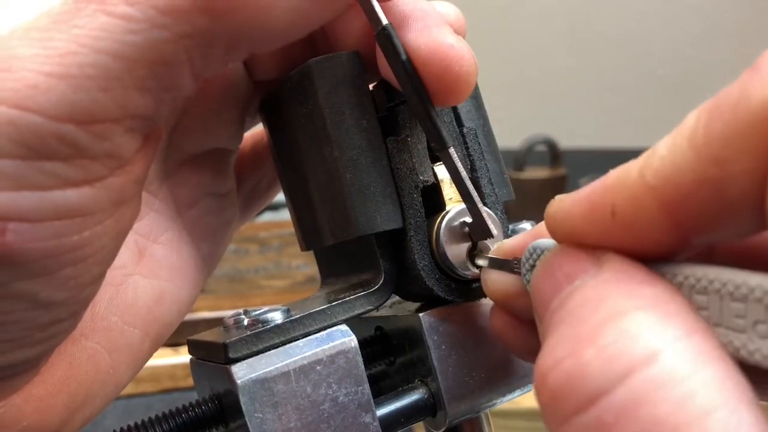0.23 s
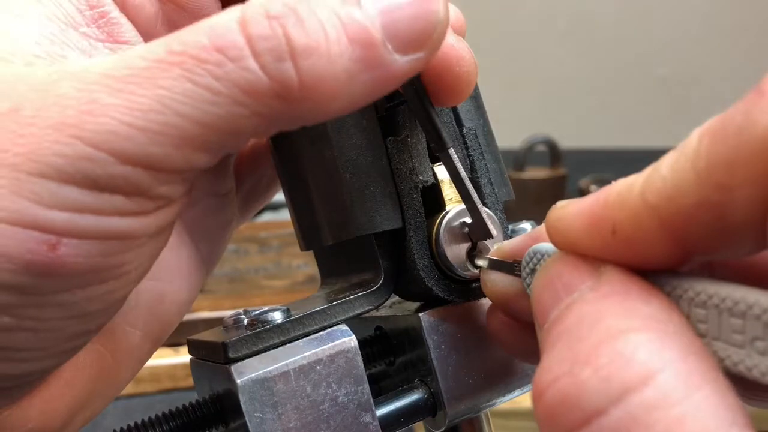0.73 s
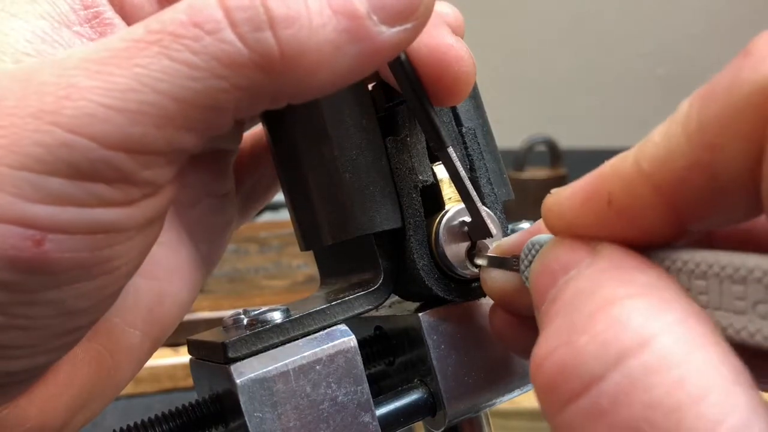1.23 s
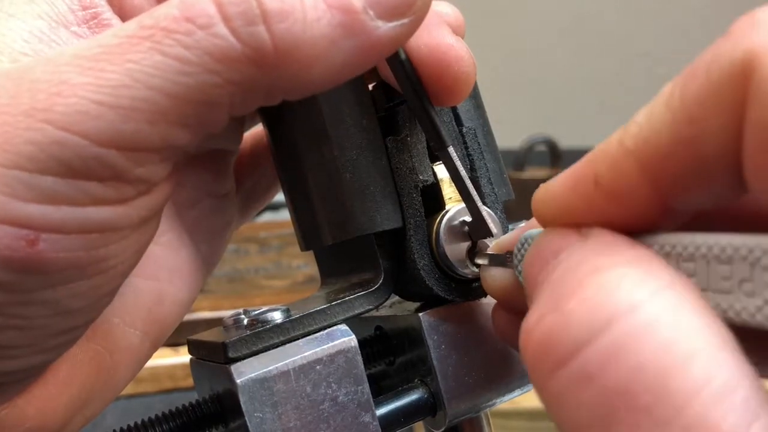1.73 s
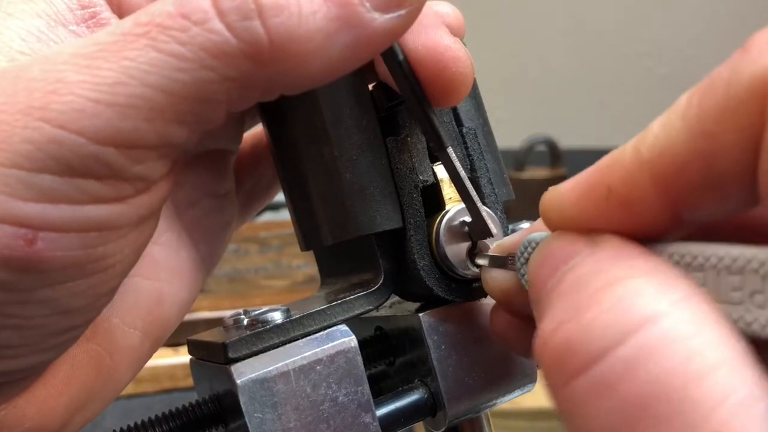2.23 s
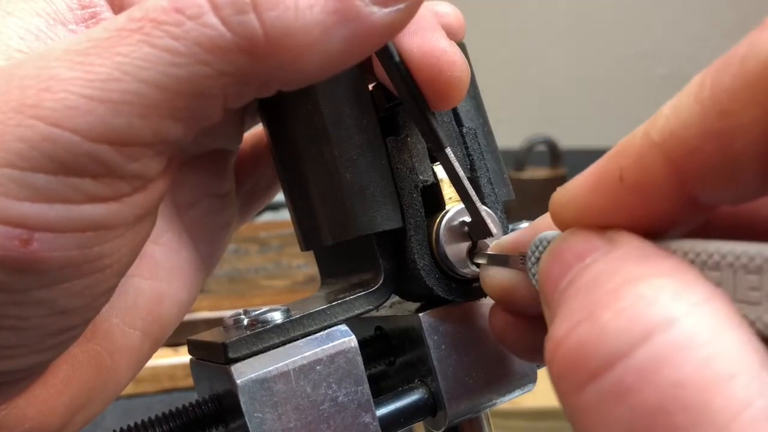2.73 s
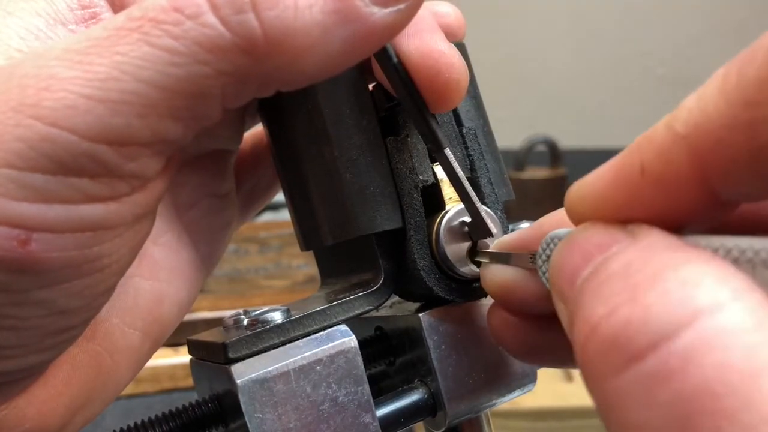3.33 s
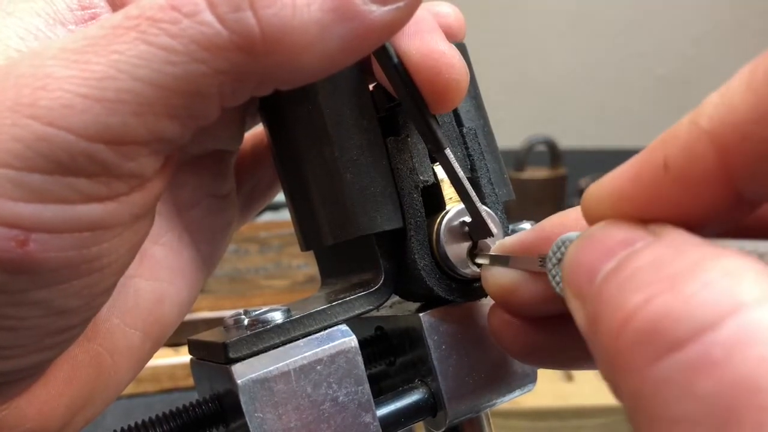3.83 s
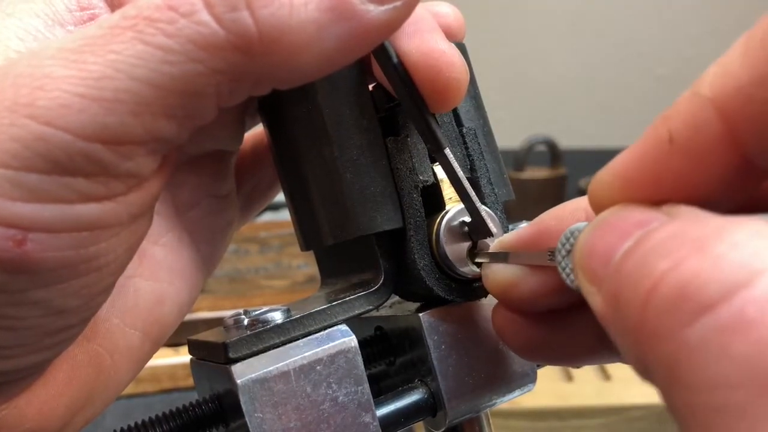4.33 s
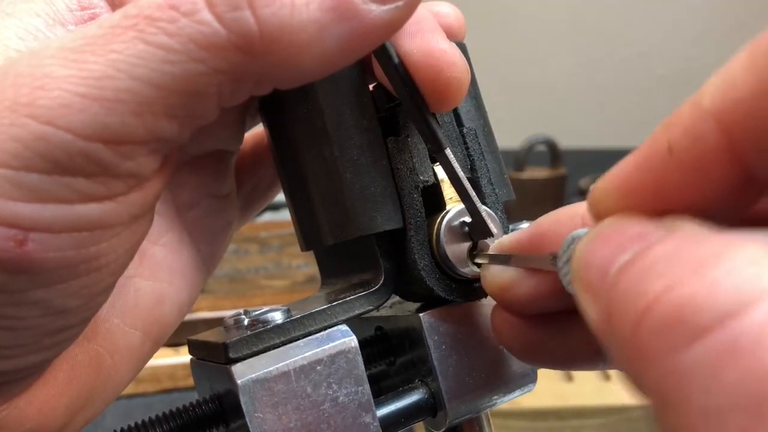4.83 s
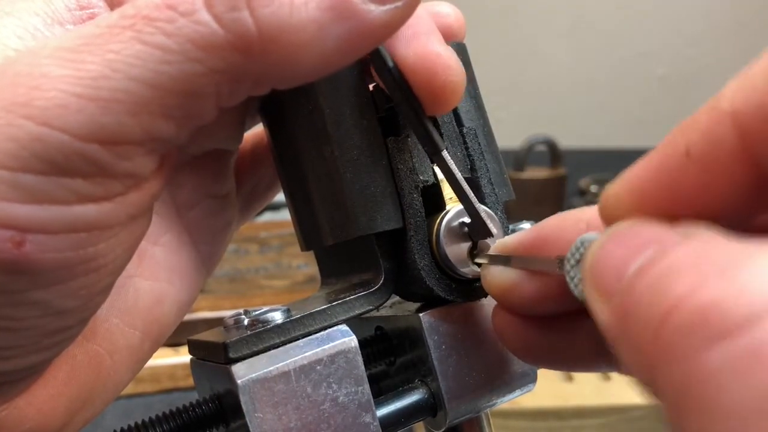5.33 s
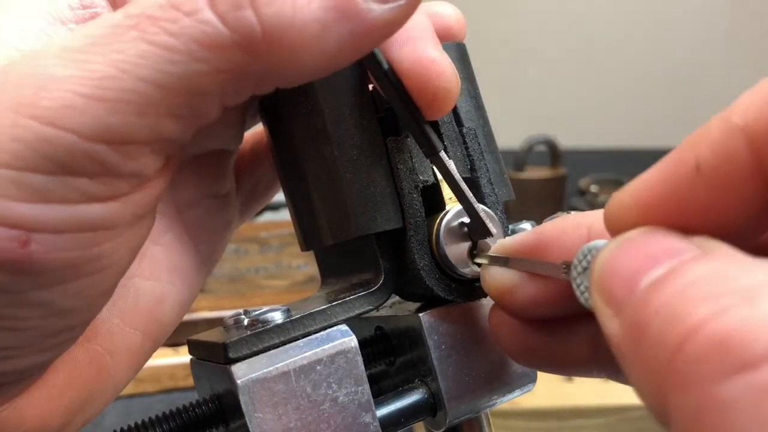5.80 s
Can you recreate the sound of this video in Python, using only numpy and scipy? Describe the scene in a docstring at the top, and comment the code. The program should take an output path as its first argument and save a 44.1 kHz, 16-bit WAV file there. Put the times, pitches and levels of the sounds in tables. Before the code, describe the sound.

A lock held in a vise is picked close to the microphone, over the faint hiss and low rumble of a quiet room. In the first second there are only a few soft, dull bumps from fingers and the lock body. From about 1.5 seconds, small metallic ticks come as pins break free and land. Just before 2 seconds the cylinder gives way with a loud, bright snap, by far the loudest sound, with a very quick bounce, a short metallic ring and a low thud from the vise that dies within half a second. Quiet picking resumes with a cluster of clicks, tiny scrapes and bumps around 2.6 to 2.8 seconds, the tension wrench ringing briefly. More ticks come near 3.3 and 3.6 seconds, then sparse light taps and soft knocks, a firmer click around 5.1 seconds, and last small ticks near 5.4 and 6 seconds.

```python
"""A pin tumbler lock, held in a vise, is picked close to the microphone in a quiet room.
First, fingers bump the lock and the pick leans on pins that stick. Then pins tick as they break free
and again as they land; the harder tick knocks the lock body and rings the tension wrench.
Near two seconds the plug (the part that turns) gives way with a loud snap that bounces, rings the
lock's shell and shakes the vise. After that the pick goes on scraping, tapping and freeing pins."""
import sys
import numpy as np
from scipy import signal
from scipy.fft import rfft, irfft, next_fast_len
from scipy.io import wavfile
from scipy.ndimage import uniform_filter1d, map_coordinates

SR = 44100
rng = np.random.default_rng(int(sys.argv[2]) if len(sys.argv) > 2 else 0)


def digitize_waveform(pressure):
    """Quantize a signal to 16-bit integers and store it at the path in sys.argv[1].

    Rows of a 2-D input are taken as channels; values are limited to [-1, 1].
    """
    field = np.atleast_2d(pressure).T
    bounded = np.clip(field, -1, 1)
    quanta = np.round(bounded * 32767).astype(np.int16)
    wavfile.write(sys.argv[1], SR, quanta)


N = 267422
LEAD_IN = .002  # seconds of quiet at the front of each short sound
TIP_HZ = 6650  # the pick's tip always rings at this pitch

# The tone colour of the pick on a pin. Each row: frequency in Hz, relative level in dB.
PICK_COLOUR = [(100, -39.5), (900, -21.5), (2200, -12), (3000, -2.5), (4200, -1), (5200, -0.5),
               (6100, -3.5), (7800, -4), (9200, -3), (11300, 2), (15500, -3.5)]
# Pins that break free and land. A fade time (t60) is how long a sound takes to drop by 60 dB.
# Each row: start in seconds, travel time in seconds, release level, landing level, brightness,
# tick fade time in seconds, blade pitch in Hz, blade boost, body level, body pitch ratio,
# wrench clack level, wrench ring level. Levels, brightness and boost are in relative dB.
PINS = [(1.5747, 0.0082, -66.5, -73, -6, .0045, 11460, 3, -69, 0.86, -82, -91),
        (1.6125, 0.0065, -51, -49.5, 3.5, 0.007, 15200, 6.5, -52, 0.95, -53, -68),
        (1.745, .0077, -57.5, -61, 8, .006, 6600, 5, -50.5, 0.95, -71, -80),
        (1.7607, .007, -70, -55.5, -4, 0.0084, 11300, 4, -61, 0.81, -74, -76),
        (1.922, .012, -63.5, -68, 10.5, .0045, 13800, 4, -73.5, 1.1, -83, -85),
        (2.626, 0.0045, -60, -55, 0.5, 0.0044, 6706, -1, -51.5, 0.98, -57, -79),
        (2.676, 0.01, -54, -57.5, 2, .005, 6670, 1, -55.5, 0.975, -65, -83.5),
        (2.771, 0.0077, -47.5, -54.5, 2.5, 0.0085, 5400, 6, -52, 1.1, -50, -46),
        (3.2482, 0.011, -49.5, -57, -3, 0.0089, 13500, 2, -53, 0.94, -57, -61),
        (3.2639, 0.008, -47, -53, 4, .007, 6600, 3, -60, 1.18, -60.5, -65),
        (3.6014, .0083, -55.5, -51.5, -1, 0.0053, 5180, 6, -55, 1.04, -69, -84),
        (4.3028, .007, -59, -80, 6, 0.0044, 10900, 8, -78, 1, -80, -89.5),
        (4.606, .0045, -54.5, -68, 4, 0.0041, 8103, 6, -52.5, 0.98, -54, -74),
        (5.1271, 0.0067, -42.5, -67, -10.5, .002, 5000, 3.5, -48, 1.05, -65, -63),
        (5.4053, .0066, -51.5, -70, 7, 0.0031, 15430, 12.5, -62, 0.97, -66, -75.5),
        (6.0207, 0.008, -54.5, -53.5, .5, .0045, 7870, 5, -63.5, 0.97, -68, -74)]
# The plug turns, strikes the pins and bounces.
# Each row: start in seconds, level in dB, rise time in seconds, fade time in seconds.
PLUG_STRIKES = [(1.9448, -11, .0007, 0.0043), (1.9522, -25.5, .0003, .0022), (1.9653, -26.5, .0002, .0028),
                (1.9782, -50, .0003, .004)]


def amp(db):
    """Turn decibels into a number to multiply by."""
    return 10 ** (np.asarray(db) / 20)


def unit(x):
    """Scale a sound so that its average strength (rms) is 1."""
    return x / np.sqrt(np.mean(x ** 2) + 1e-20)


def along(points, hz):
    """Read between (frequency, value) points, with frequency on a log scale."""
    frequencies, values = np.transpose(points)
    return np.interp(np.log(hz + 1), np.log(frequencies + 1), values)


def filtered(x, response):
    """Turn each frequency of a sound up or down by response(hz)."""
    size = next_fast_len(len(x) + 2 ** 12)
    return irfft(rfft(x, size) * response(np.fft.rfftfreq(size, 1 / SR)), size)[:len(x)]


def band_limit(hz, top_hz=16250):
    """Gains that cut off the very highest treble steeply."""
    return 1 / np.sqrt(1 + (hz / top_hz) ** 140)


def causal(gain):
    """Make a filter with these gains that rings only after it is struck, never before."""
    cepstrum = irfft(np.log(np.maximum(gain, 1e-6)))
    half = len(cepstrum) // 2
    return np.exp(rfft(np.concatenate([cepstrum[:1], 2 * cepstrum[1:half], np.zeros(half)])))


def add(track, s, sound):
    """Mix a sound into the track so that it strikes at s seconds."""
    start = max(round((s - LEAD_IN) * SR), 0)
    part = track[start:start + len(sound)]
    part += sound[:len(part)]


def ring(modes, attack, scatter_db, detune):
    """A struck part rings with fading tones; grip and point of contact change them a little each time."""
    t = np.maximum(np.arange(SR // 4) / SR - LEAD_IN, 0)
    hz, db, t60 = np.transpose(modes)[:, :, None]
    hz = hz * (1 + detune * rng.standard_normal(hz.shape))
    level = db + scatter_db * rng.standard_normal(hz.shape) - 60 * t / t60
    tones = amp(level) * np.cos(2 * np.pi * hz * (t - attack))
    sound = tones.sum(0) * (1 - np.exp(-(t / attack) ** 2))
    return sound / np.abs(sound).max()


def contact(colour, t60, after_db, after_t60, bright_db, rise=.0001, smooth_bins=130):
    """Two things hit: a burst of noise made of a main part and a quieter one, each with its own fade."""
    t = np.maximum(np.arange(SR // 6) / SR - LEAD_IN, 0)
    onset = 1 - np.exp(-(t / rise) ** 2)
    fade = amp(-60 * t / t60) + amp(after_db - 60 * t / after_t60)
    burst = onset * rng.standard_normal(len(t)) * fade
    size = 2 ** 13
    spectrum, hz = rfft(burst, size), np.fft.rfftfreq(size, 1 / SR)
    # the fine detail is chance, but the broad colour belongs to the material
    flatten = 1 / np.sqrt(np.abs(uniform_filter1d(np.abs(spectrum) ** 2, size=smooth_bins)) + 1e-12)
    # the brightness setting turns the high treble up or down
    tilt = [(6300, 0.00042), (8500, 0.49 * bright_db), (15000, bright_db)]
    gain = flatten * amp(along(colour, hz) + along(tilt, hz))
    click = irfft(spectrum * causal(gain) * band_limit(hz), size)[:len(t)]
    return click / np.linalg.norm(click) * np.sqrt(SR / 1000)  # the energy of one millisecond at rms 1


def air(level_db=-68, rumble_hz=350, swing_db=.8, swells_per_s=14):
    """The room rumbles a little unevenly under the steady hiss of the microphone."""
    # The colour of rumble and hiss. Each row: frequency in Hz, relative level in dB.
    air_colour = [(15, -58), (25, -27), (40, -10.5), (56, -6), (114, -2.8), (153, -3.5), (185, -3),
                  (212, -5.5), (242, -2.5), (270, -7.5), (463, -12), (1130, -22), (2160, -26),
                  (10100, -31.5), (16000, -34)]
    noise = unit(filtered(rng.standard_normal(N), lambda hz: amp(along(air_colour, hz))))
    rumble = filtered(noise, lambda hz: 1 / (1 + (hz / rumble_hz) ** 4))
    swell = map_coordinates(rng.standard_normal(2 ** 8), [np.arange(N) / SR * swells_per_s], mode="wrap")
    return amp(level_db) * (noise + rumble * (amp(swing_db * swell) - 1))


def room(x, build_up_s):
    """The bench and walls throw the sound back; the bass hangs on longest."""
    # How long the echo lasts. Each row: frequency in Hz, fade time in seconds.
    fade_times = [(160, 0.94), (260, .4), (500, 0.39), (2000, 0.2), (6000, .15), (14000, 0.14)]
    # How strong the echo is. Each row: frequency in Hz, gain in dB.
    echo_gains = [(160, -8.5), (300, -11.5), (500, -18), (1000, -18.5), (2000, -19), (4500, -23),
                  (7000, -23), (10700, -23), (14000, -29)]
    hz, t, spectra = signal.stft(rng.standard_normal(SR), SR, nperseg=512)
    t60 = along(fade_times, hz)[:, None]
    tail = signal.istft(spectra * amp(-60 * t / t60) / np.sqrt(t60), SR, nperseg=512)[1]
    tail *= 1 - np.exp(-np.arange(len(tail)) / SR / build_up_s)
    echo = signal.fftconvolve(x, tail / np.linalg.norm(tail))[:N]
    return filtered(echo, lambda hz: amp(along(echo_gains, hz)))


def bumps():
    """Fingers shift their grip and bump softly against the lock."""
    # The finger bumps. Each row: start in seconds, level in dB.
    touches = [(.36, -57), (.725, -62), (2.612, -53), (2.64, -52), (2.66, -51), (3.53, -56), (4.77, -55),
               (4.925, -53), (4.945, -50.5), (5.409, -56.5), (5.423, -52.5)]
    # The colour of a soft finger. Each row: frequency in Hz, relative level in dB.
    finger_colour = [(30, -16), (80, 1.5), (200, -1), (400, -8), (800, -27), (3000, -55)]
    out = np.zeros(N)
    for s, db in touches:
        bump = contact(finger_colour, t60=.032, after_db=-13, after_t60=.073, bright_db=0, rise=.0038)
        add(out, s, amp(db) * bump)
    return out


def blade(x, ring_hz, width_hz, boost_db):
    """The thin steel blade of the pick rings with whatever it touches."""
    def response(hz):
        damping = 1j * hz * width_hz
        return 1 + amp(boost_db) * damping / (ring_hz ** 2 - hz ** 2 + damping)
    return filtered(x, response)


def friction(length, slips_per_s=3000, spread_db=4):
    """Sliding steel catches and slips in many tiny steps, over a light hiss."""
    n = max(int(length * SR), 2)
    slipping = rng.random(n) < slips_per_s / SR
    slips = slipping * rng.choice([-1, 1], n) * amp(spread_db * rng.standard_normal(n))
    return unit(unit(slips) + 0.55 * rng.standard_normal(n))


def scrapes():
    """The pick drags over the pins and its tip rings; each drag has its own brightness."""
    # The drags. Each row: start in seconds, length in seconds, relative level in dB, brightness in dB.
    drags = [(1.758, 0.019, -63, -1), (2.625, 0.039, -65, 0), (2.641, .008, -63, 0),
             (2.663, .024, -61.5, -6), (3.25, .028, -60, 1), (3.595, 0.0092, -59, 6), (3.609, .005, -57, 0),
             (4.909, .03, -64, -3), (5.427, .012, -70, -2), (6.013, 0.024, -64, -3)]
    out = np.zeros(N)
    for s, length, db, bright_db in drags:
        drag = friction(length)
        swell = np.hanning(len(drag)) ** 0.19
        drag = np.pad(amp(db) * drag * swell, round(LEAD_IN * SR))
        tilt = [(2200, 2), (3200, 3.5), (6000, -1), (9000, -2), (14000, bright_db)]
        add(out, s, filtered(drag, lambda hz: amp(along(PICK_COLOUR, hz) + along(tilt, hz))))
    return blade(out, TIP_HZ, width_hz=620, boost_db=-5)


def taps():
    """Feeling for the next pin, the pick ticks lightly on pins that stay put."""
    # The taps. Each row: start in seconds, level in dB, brightness in dB.
    touches = [(2.672, -54, -14), (2.775, -53.5, -2), (3.244, -62, -6), (3.2665, -49.5, -2),
               (3.2777, -54.5, -7), (3.311, -64.5, 4), (3.397, -64.5, -4.5), (3.46, -69, -1),
               (3.577, -68, 0), (3.601, -59, 16), (3.81, -66, -6), (3.947, -66.5, -2.5), (4.424, -67.5, -6),
               (4.631, -69, -1.5), (4.635, -69, -9), (4.929, -60, -2.5), (5.16, -66, -8), (5.545, -65, 2),
               (6.015, -58, -4), (6.027, -60, -1)]
    out = np.zeros(N)
    for s, db, bright_db in touches:
        tap = contact(PICK_COLOUR, t60=.0038, after_db=-12, after_t60=.016, bright_db=bright_db)
        add(out, s, amp(db) * tap)
    return out


def jolt(body_db, pitch, clack_db, wrench_db):
    """The lock body rocks and rubs in the hand; the wrench clacks in the keyhole and rings."""
    # The tones of body and wrench. Each row: frequency in Hz, relative level in dB, fade time in seconds.
    body_tones = [(331.5, -13, 0.07), (436.36, -6.5, .046), (485, -1.5, .045), (534, -1.5, 0.069)]
    wrench_tones = [(1584, -8, .06), (1700, -12, .025), (1809, 2, 0.066), (1862, -7.5, .03),
                    (2010, -9.5, .025), (2392, -19.5, .05)]
    # The colours of the clack and the rub. Each row: frequency in Hz, relative level in dB.
    clack_colour = [(100, -45.5), (600, -13.5), (900, 1.5), (1200, 1), (1900, -1.5), (2600, -3.5),
                    (3200, -3), (4500, -13), (12000, -30.5)]
    rub_colour = [(100, -18), (330, -5), (520, 2.5), (630, -12), (1300, -25), (5000, -50)]
    gripped_tones = [(hz * pitch, db, t60) for hz, db, t60 in body_tones]  # the grip sets the pitch
    body = ring(gripped_tones, attack=.00585, scatter_db=1, detune=.015)
    wrench = ring(wrench_tones, attack=.003, scatter_db=0, detune=.003)
    clack = contact(clack_colour, t60=.0055, after_db=-9.5, after_t60=.067, bright_db=-.5)
    rub = contact(rub_colour, t60=.028, after_db=-10, after_t60=.08, bright_db=-2.5, rise=.003)
    rings = amp(body_db - 1) * body + amp(wrench_db) * wrench
    noises = amp(clack_db) * clack + amp(body_db - 3) * rub
    return rings + np.pad(noises, (0, len(rings) - len(noises)))


def knocks():
    """The lock is jolted by each pin's harder tick, and when the pick leans on a pin that sticks."""
    # Dull knocks on stuck pins. Each row: start in seconds, body and wrench ring levels in relative dB.
    nudges = [(0.24, -54.5, -85), (1.55, -62, -90), (1.735, -53, -80), (1.837, -59.5, -94),
              (2.647, -55.5, -82), (3.075, -60, -88), (3.845, -58.5, -88), (3.949, -60.5, -72),
              (4.423, -60.5, -88.5), (4.925, -63, -72), (5.1135, -49.5, -60.5)]
    out = np.zeros(N)
    for s, travel, release_db, landing_db, *_, body_db, pitch, clack_db, wrench_db in PINS:
        harder_tick_s = s + travel if landing_db > release_db else s
        add(out, harder_tick_s, jolt(body_db, pitch, clack_db, wrench_db))
    for s, body_db, wrench_db in nudges:
        add(out, s, jolt(body_db, pitch=.99, clack_db=body_db - 16.5, wrench_db=wrench_db))
    return out


def pin_ticks(blade_q=7.4):
    """A pin ticks on the pick as it breaks free, then lands in its chamber; a gritty pin ticks longer."""
    out = np.zeros(N)
    for s, travel, release_db, landing_db, bright_db, t60, ring_hz, ring_db, *_ in PINS:
        for at, db in (s, release_db), (s + travel, landing_db):
            tick = contact(PICK_COLOUR, t60=t60, after_db=-15.5, after_t60=.012, bright_db=bright_db)
            add(out, at, amp(db + 2) * blade(tick, ring_hz, ring_hz / blade_q, ring_db))
    return out


def vise_thud(vise_db=-36.5, bench_db=-52.5, bench_t60=.45):
    """The snap slowly sets the heavy vise swinging, and the bench rumbles on under it."""
    # The tones of the vise. Each row: frequency in Hz, relative level in dB, fade time in seconds.
    vise_tones = [(128, -14, 0.0901), (170, -7, 0.12), (210, 0, .125), (262, -14.5, .1), (330, -13, .08)]
    # The colour of the bench. Each row: frequency in Hz, relative level in dB.
    bench_colour = [(40, -26.5), (110, -7.5), (180, 0), (230, -8), (330, -12), (450, -28), (700, -45)]
    out, t = np.zeros(N), np.arange(SR) / SR
    snap_s = PLUG_STRIKES[0][0]
    rumble = unit(filtered(rng.standard_normal(SR), lambda hz: amp(along(bench_colour, hz))))
    onset = 1 - np.exp(-t / .012)
    add(out, snap_s, rumble * onset * amp(bench_db - 60 * t / bench_t60))
    add(out, snap_s + .0039, amp(vise_db) * ring(vise_tones, attack=.016, scatter_db=1, detune=.003))
    return out


def plug_snap(rattle_db=-35, spring_db=-41.5, shell_db=-41.5):
    """The plug cracks at each strike; the first jolts the lock and shakes pins, springs and shell."""
    # The colours of the crack, the rattling pins and the shivering springs.
    # Each row: frequency in Hz, relative level in dB.
    crack_colour = [(100, -51.5), (620, -35), (850, -16.5), (1120, -15), (1330, -30), (1520, -20),
                    (1680, -30), (1950, -19), (2350, -22.5), (2750, -33), (3500, -15), (4500, -13),
                    (5000, -27.5), (5400, -29), (5800, -11), (6200, -14), (6700, -6), (7900, -13),
                    (8550, -20), (9150, -8.5), (9500, -12), (10400, -5), (11900, 0.5), (12950, -7),
                    (13450, 0), (14050, 2), (14600, -11), (15600, -3), (16200, -8)]
    rattle_colour = [(60, -34.5), (400, -1.5), (1100, 0), (2000, 2.5), (2700, -2.5), (3900, -0.5),
                     (5200, -5), (6700, -0.5), (10500, -2), (15000, -6.5)]
    spring_colour = [(100, -60), (8500, -30), (10000, -6.5), (10630, -0.5), (11300, -8), (12500, -16),
                     (13500, -9), (16000, -18)]
    # The tones of the shell. Each row: frequency in Hz, relative level in dB, fade time in seconds.
    shell_tones = [(888, -7.5, 0.098), (1126, -2, 0.19), (1940, 2, 0.0849), (2015, -1.5, 0.069),
                   (2250, -8.5, .07), (2390, -2.5, .09), (2430, -6, .1), (3130, -5, .1), (3580, -9.5, .1),
                   (3890, -7, 0.089), (4770, -12, .12), (4900, -10.5, 0.11)]
    out, snap_s = np.zeros(N), PLUG_STRIKES[0][0]
    for s, db, rise, t60 in PLUG_STRIKES:
        crack = contact(crack_colour, t60, after_db=-29, after_t60=.018, bright_db=0,
                        rise=rise, smooth_bins=90)
        add(out, s, amp(db) * crack)
    rattle = contact(rattle_colour, t60=.19, after_db=-2.5, after_t60=.03, bright_db=-2)
    springs = contact(spring_colour, t60=.2, after_db=-10, after_t60=.05, bright_db=.5)
    shell = ring(shell_tones, attack=.00089, scatter_db=3, detune=.002)
    add(out, snap_s, amp(rattle_db) * rattle)
    add(out, snap_s, amp(spring_db) * springs)
    add(out, snap_s, amp(shell_db) * shell)
    add(out, snap_s + .00099, jolt(body_db=-30.5, pitch=.98, clack_db=-57, wrench_db=-50))
    return out


def scene():
    """The lock and its tools, their echo and the quiet room, in one channel."""
    pick = blade(pin_ticks() + taps() + scrapes(), TIP_HZ, width_hz=260, boost_db=3)
    lock = pick + knocks() + bumps() + plug_snap() + vise_thud()
    return (lock + room(lock, build_up_s=.0026) + air())[None]


def record(dry):
    """Cut off the very highest treble."""
    return np.array([filtered(x, band_limit) for x in dry])


dry = scene()
out = record(dry)
digitize_waveform(out)
```